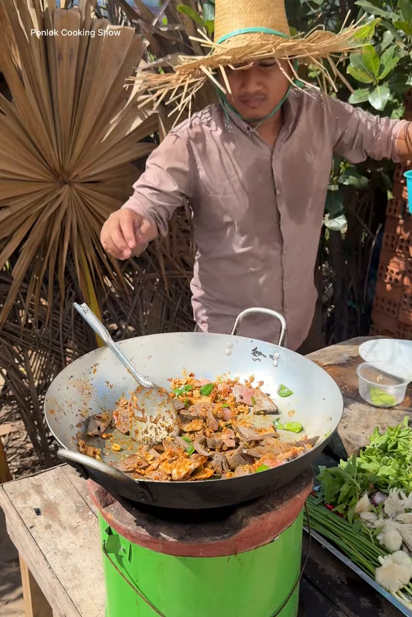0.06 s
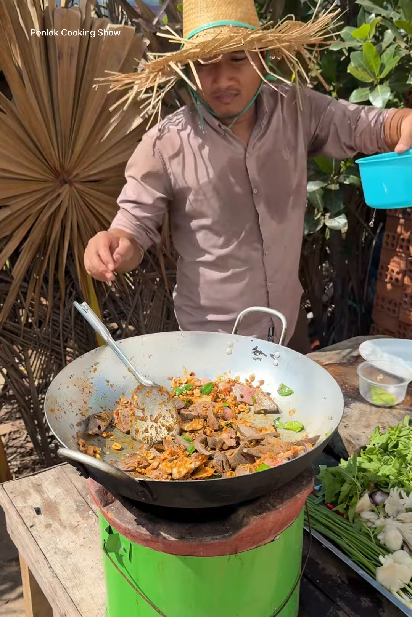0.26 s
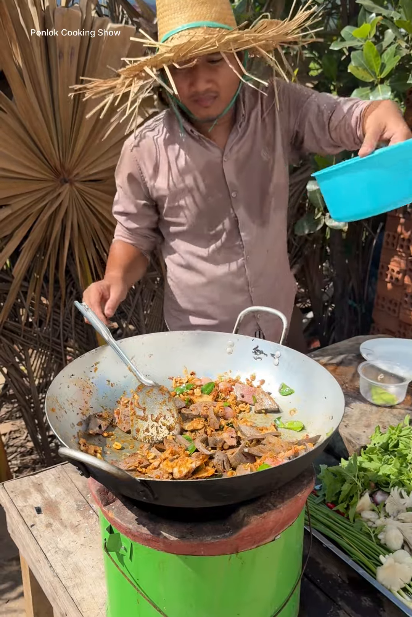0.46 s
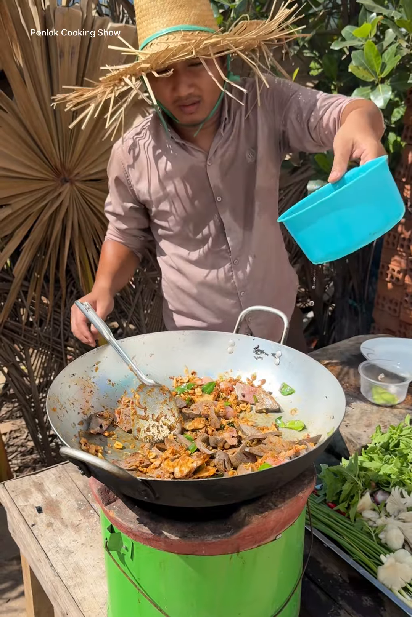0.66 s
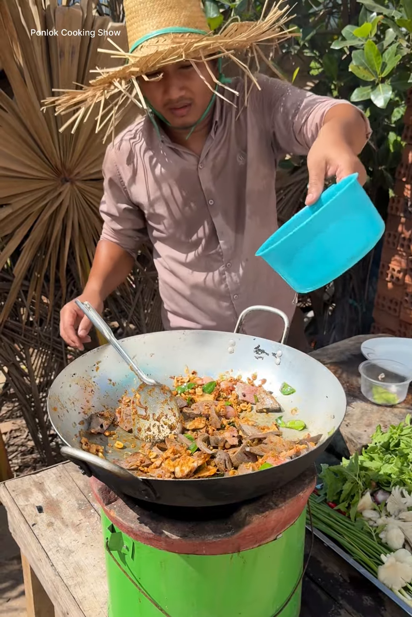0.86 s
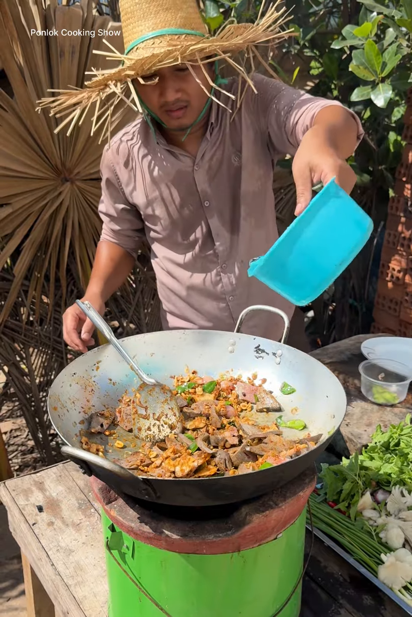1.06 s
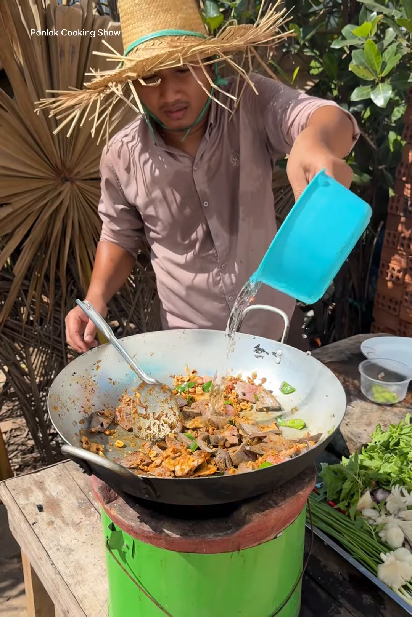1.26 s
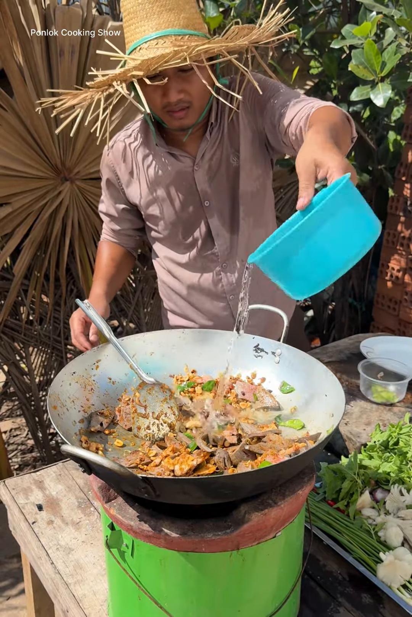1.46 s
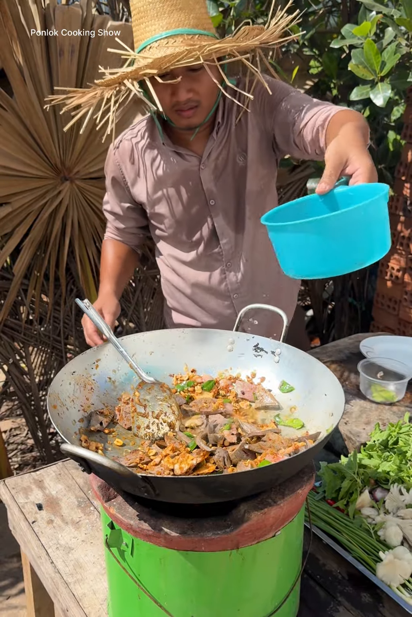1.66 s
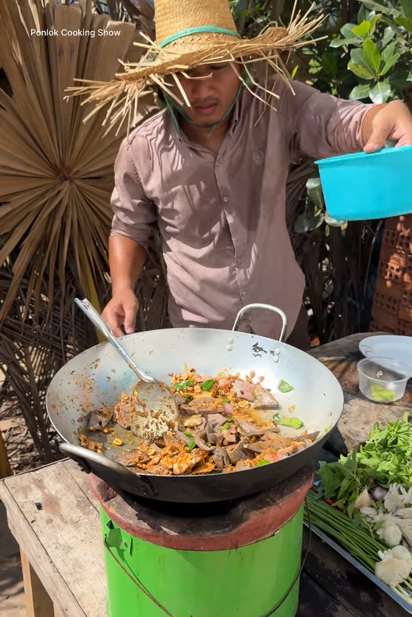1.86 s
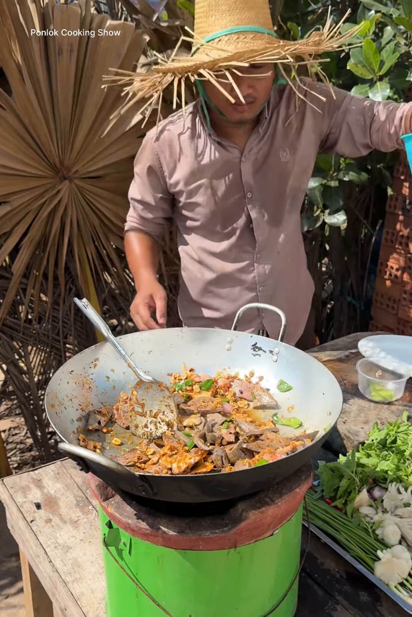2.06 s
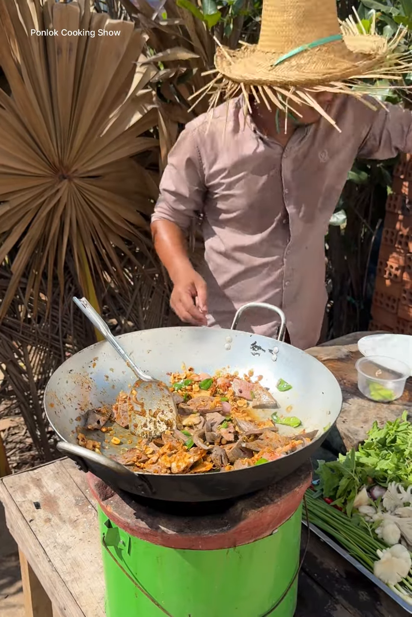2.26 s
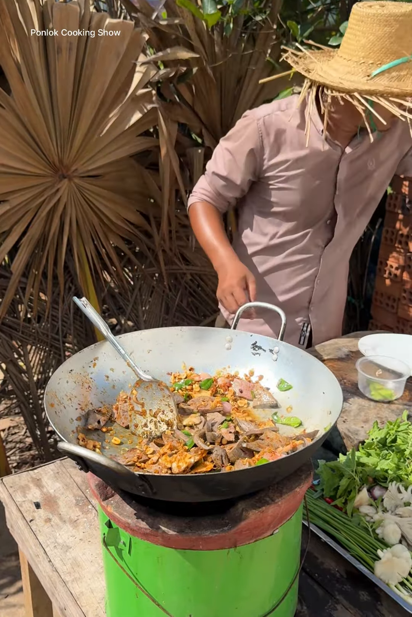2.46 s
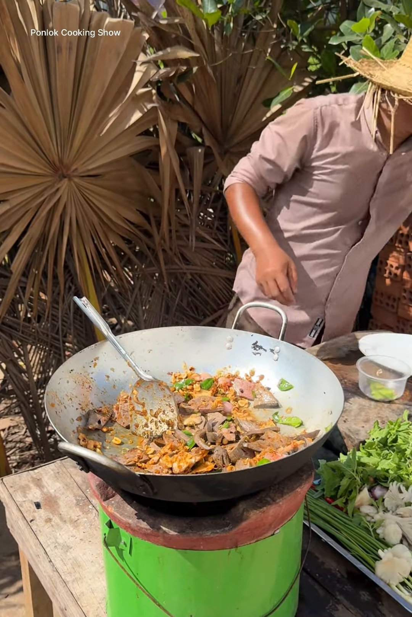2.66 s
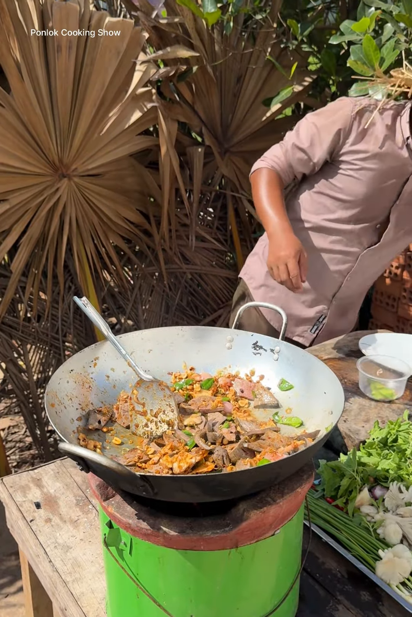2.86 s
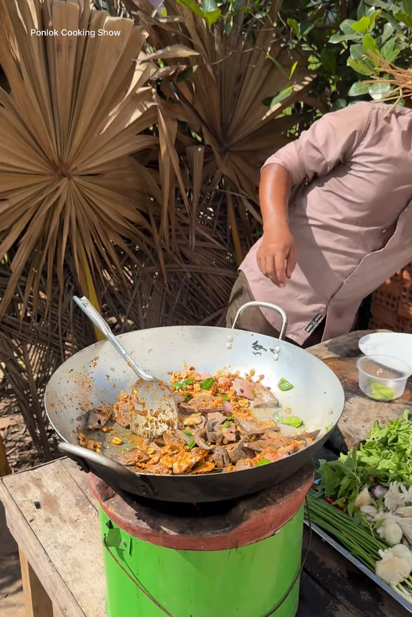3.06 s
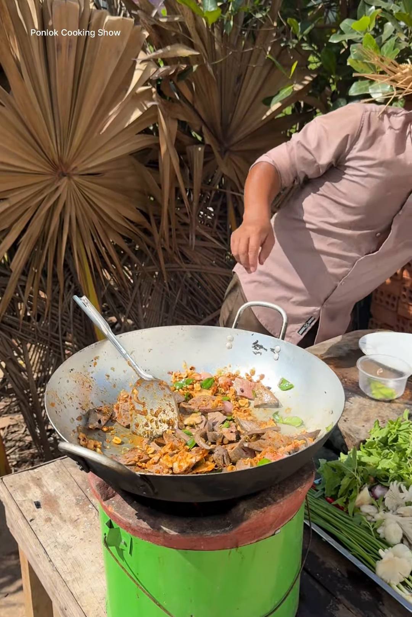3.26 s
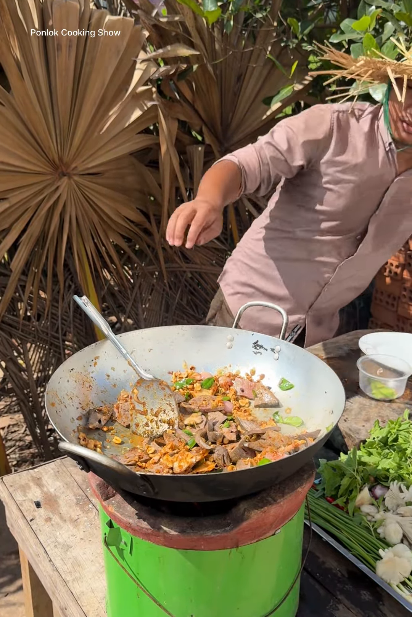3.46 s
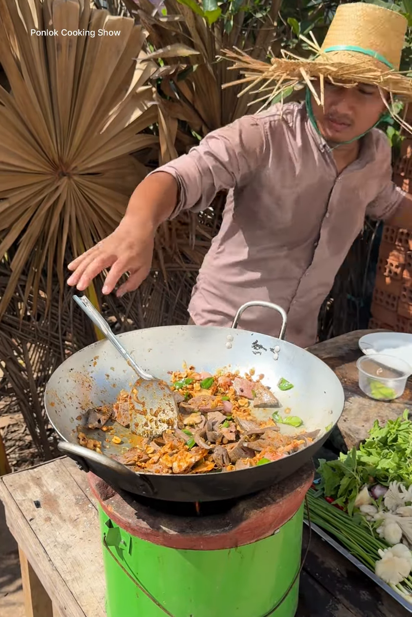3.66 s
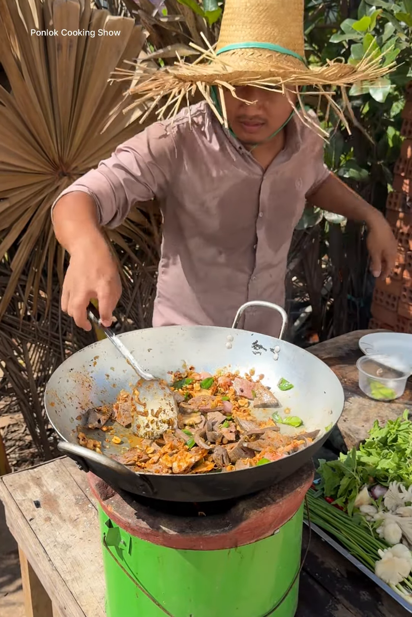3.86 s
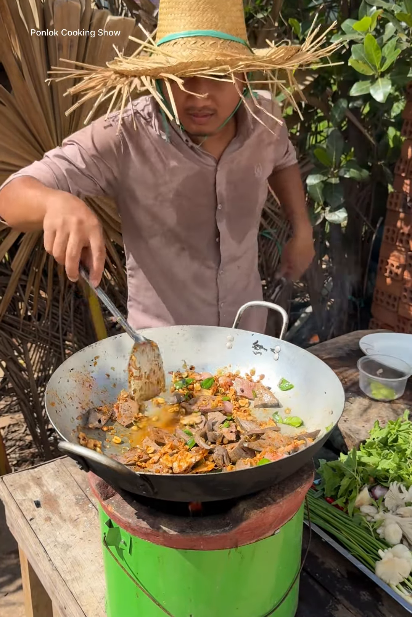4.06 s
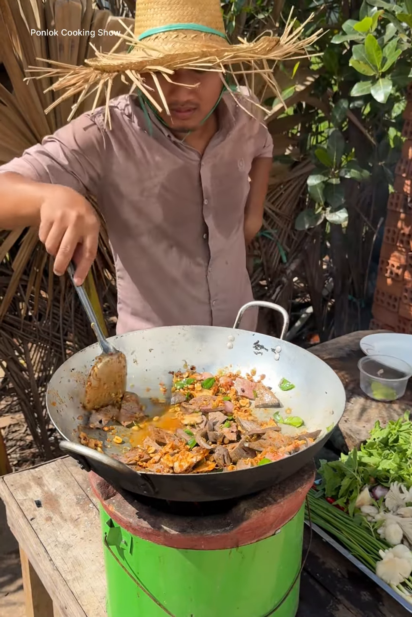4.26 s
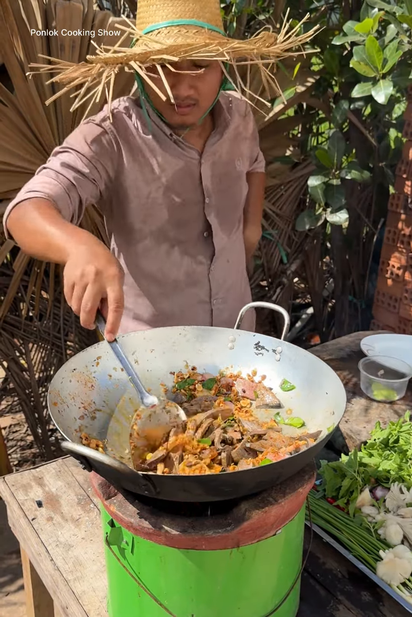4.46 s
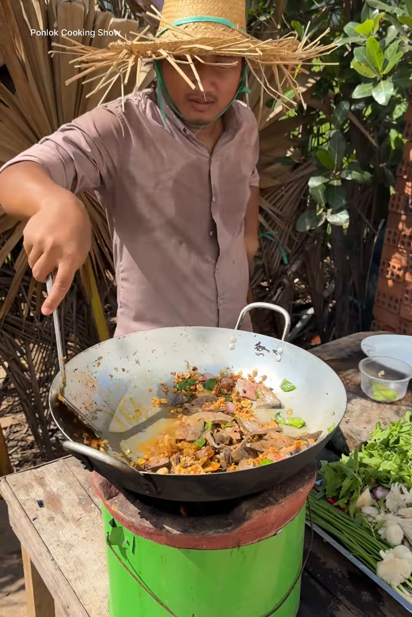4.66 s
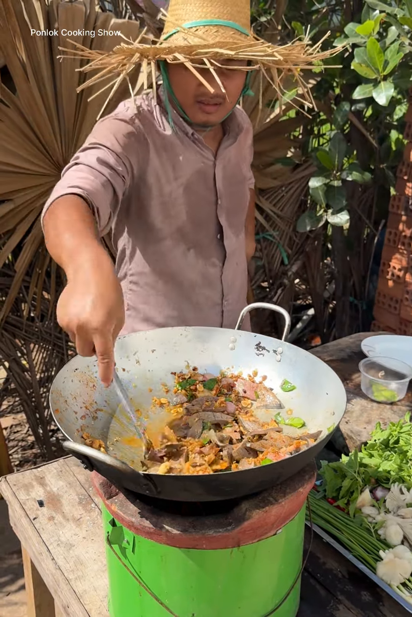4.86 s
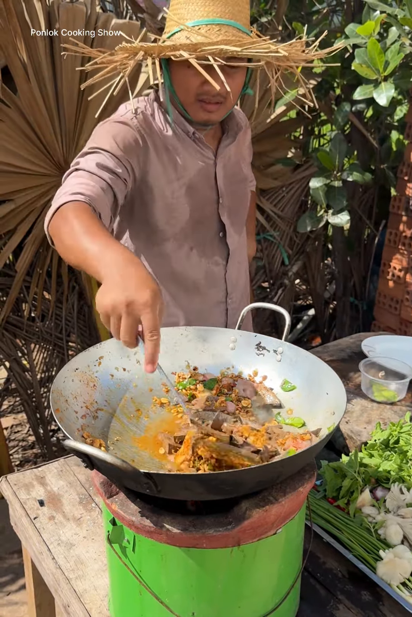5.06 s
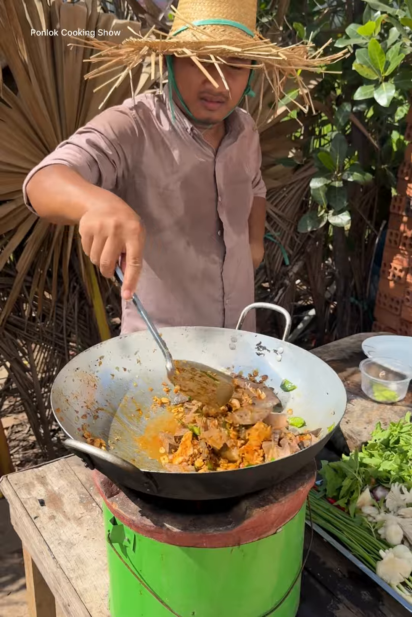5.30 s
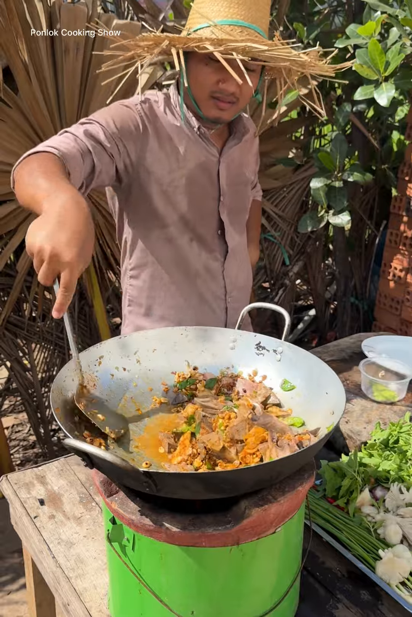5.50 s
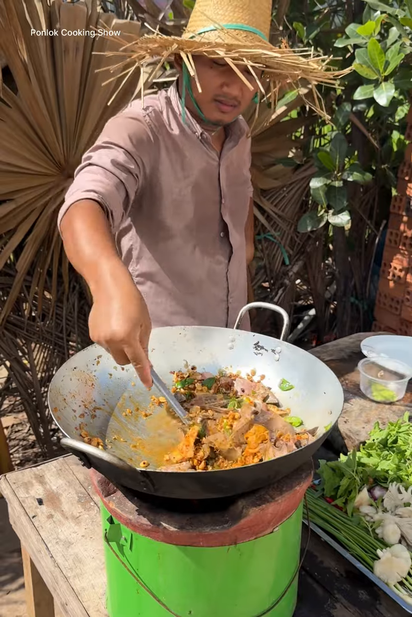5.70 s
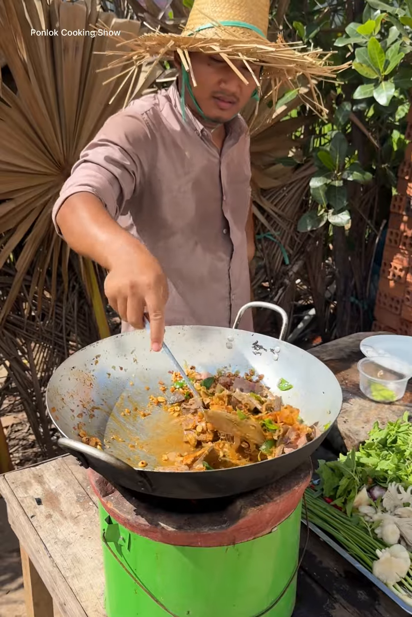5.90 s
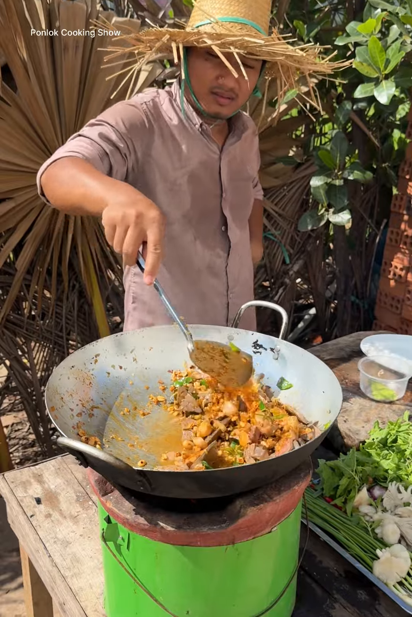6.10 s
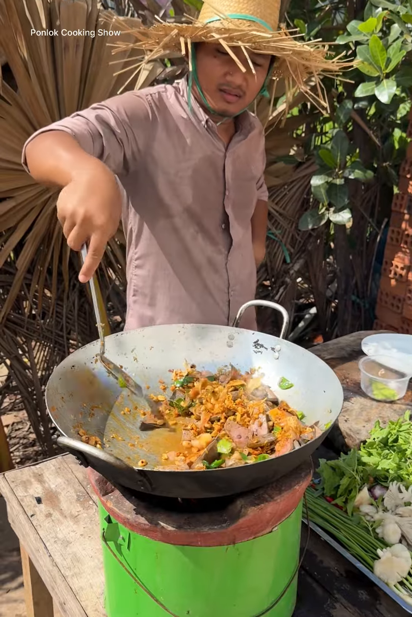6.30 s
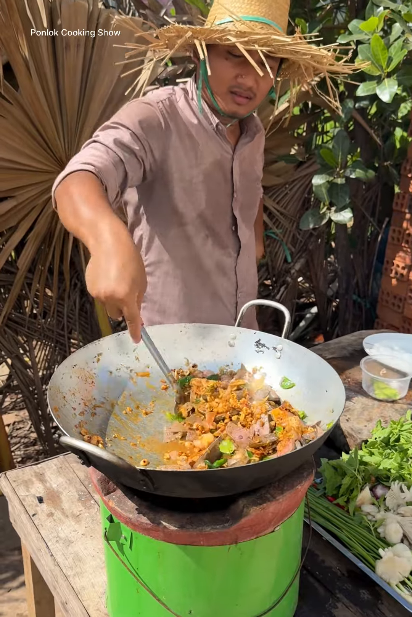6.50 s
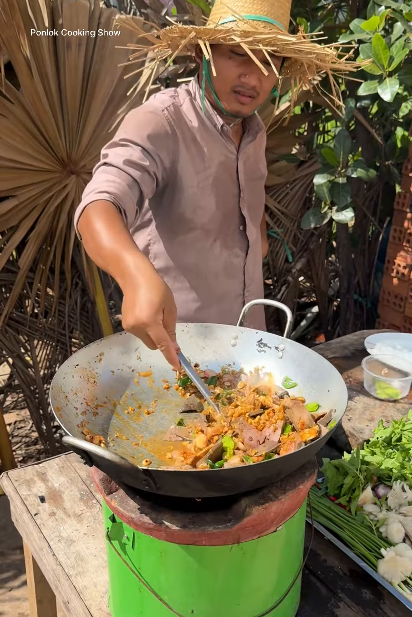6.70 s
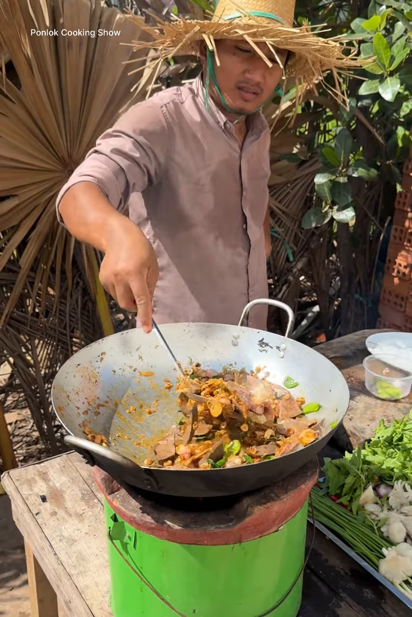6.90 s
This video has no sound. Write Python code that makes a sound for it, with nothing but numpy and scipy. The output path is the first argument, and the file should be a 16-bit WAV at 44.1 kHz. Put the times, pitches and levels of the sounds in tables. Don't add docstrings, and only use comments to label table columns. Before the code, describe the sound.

Close outdoor phone pickup in stereo: fat crackles steadily in a steel wok, then water makes it flare into a loud steamy hiss around one and a half seconds. It subsides with sharp spits. A hollow plastic tub lands and rocks, small birds chirp, then a metal spatula clacks, scrapes and chatters in bursts as the sizzle grows thin. A distant engine hums behind.

```python
import sys
import numpy as np
from scipy import signal
from scipy.fft import rfft, irfft, next_fast_len
from scipy.io import wavfile
from scipy.ndimage import uniform_filter1d

SR = 44100
rng = np.random.default_rng(int(sys.argv[2]) if len(sys.argv) > 2 else 0)


def linear_from_db(decibels):
    return 10 ** (np.asarray(decibels, float) / 20)


def unload_audio(sound):
    columns = np.transpose(np.atleast_2d(sound))
    steps = np.round(np.clip(columns, -1, 1) * 32767)
    wavfile.write(sys.argv[1], SR, steps.astype(np.int16))


N = 306054
TIME = np.arange(N) / SR
SIZE = next_fast_len(N + 8192)
BINS_HZ = np.maximum(np.arange(SIZE // 2 + 1) * SR / SIZE, 1)


def rms_one(x):
    return x / np.sqrt(np.mean(x ** 2) + 1e-20)


def in_time(rows):
    s, level_db = np.transpose(rows)
    return np.interp(TIME, s, level_db)


def at_hz(points, ends=None):
    hz, value = np.transpose(points)
    return np.interp(np.log(BINS_HZ), np.log(hz), value, ends, ends)


def colour(x, spectrum):
    return rms_one(irfft(rfft(x, SIZE) * linear_from_db(at_hz(spectrum, -80)), SIZE)[..., :N])


def drift(rate):
    r = np.exp(-80 * np.pi * rate / SR)
    white = rng.standard_normal(N // 40 + 2002)
    slow = signal.lfilter([1], [1, -2 * r, r * r], white)[2000:]
    return np.interp(np.arange(N) / 40, np.arange(len(slow)), rms_one(slow))


def grains(per_s, spread_db):
    sizes = linear_from_db(spread_db * np.minimum(rng.exponential(1, N), 5)) * rng.choice([-1, 1], N)
    return rms_one(sizes * (rng.random(N) < per_s / SR))


def patchy(x, edges_hz, patch_db, rate):
    out = 0
    for k, pair in enumerate(zip(edges_hz, edges_hz[1:])):
        band = signal.sosfilt(signal.butter(2, pair, "band", fs=SR, output="sos"), x)
        out = out + (-1) ** k * linear_from_db(patch_db * drift(rate)) * band
    return rms_one(out)


def bursts(times, peaks_db, t60s, spectrum):
    envelope = np.zeros(N)
    for s, peak_db, t60 in zip(times, peaks_db, t60s):
        tail = envelope[int(s * SR):int((s + t60) * SR)]
        age = np.arange(len(tail)) / SR
        tail += linear_from_db(peak_db - 60 * age / t60) * (1 - np.exp(-age / 0.00084))
    return envelope * colour(rng.standard_normal(N), spectrum)


def ring(clicks, hz, t60):
    r, w = linear_from_db(-60 / (t60 * SR)), 2 * np.pi * hz / SR
    return signal.lfilter([0, np.sin(w)], [1, -2 * r * np.cos(w), r * r], clicks + 1e-18)


def ping(at, hz, level_db, t60):
    out, age = np.zeros(N), np.arange(int(t60 * SR)) / SR
    tail = out[int(at * SR):int(at * SR) + len(age)]
    tail += (linear_from_db(level_db - 60 * age / t60) * np.sin(2 * np.pi * hz * age))[:len(tail)]
    return out


def strike(modes, times, levels_db, scatter_db=0):
    at, out = (np.asarray(times) * SR).astype(int), 0
    chance = rng.standard_normal((len(at), len(modes)))
    for k, (hz, level_db, t60) in enumerate(modes):
        clicks = np.zeros(N)
        clicks[at] = linear_from_db(levels_db + level_db + scatter_db * chance[:, k]) * (-1) ** k
        out = out + ring(clicks, hz, t60)
    return out


def rub(modes, contact, damping):
    out = 0
    for k, (hz, level_db, t60) in enumerate(modes):
        mode = rms_one(ring(contact, hz, t60 * damping))
        out = out + linear_from_db(level_db + 3.2 * drift(13.5)) * (-1) ** k * mode
    return rms_one(out)


def glides(rows):
    out = np.zeros(N)
    for s, length, start_hz, end_hz, level_db, *arch_hz in rows:
        n, at = int(length * SR), int(s * SR)
        hz = np.linspace(start_hz, end_hz, n) + sum(arch_hz) * np.sin(np.linspace(0, np.pi, n))
        tone = np.sin(2 * np.pi * np.cumsum(hz) / SR)
        out[at:at + n] += linear_from_db(level_db + 5.5) * np.sqrt(np.hanning(n)) * tone
    return out


# peak time in seconds, width in seconds, level in dB.
GUSTS = [(.2, 0.06, -43), (.4, 0.13, -43), (0.758, .04, -44), (1.2, .2, -72), (1.75, 0.082, -63.5),
         (2.3, 0.092, -26), (3.5, 0.21, -64), (4.2, 0.18, -44), (5.4, 0.031, -38), (6.18, .13, -37),
         (6.8, .1, -59)]


def wind():
    level = linear_from_db(-69)
    for s, width, level_db in GUSTS:
        level = level + linear_from_db(level_db) * np.exp(-((TIME - s) / width) ** 2)
    spectrum = [(25, -22), (60, 11), (130, 1), (220, -17), (500, -31), (1200, -38)]
    noise = colour(rng.standard_normal(N) * linear_from_db(5.3 * drift(12)), spectrum)
    return linear_from_db(-13) * level * noise * [[1], [-1]]


# multiple of the engine speed, rms level in dB.
ORDERS_DB = [(2, -57), (3, -59), (4, -65), (5, -52), (6, -54), (7, -62.5), (8, -74.5), (9, -64)]
# time in seconds, level in dB.
ENGINE_FADE = [(0, 2), (3.5, 2.5), (5.2, -4.5), (6.94, -5)]
# frequency in Hz, density in dB per Hz.
RUMBLE = [(12, -47), (20, -65), (43, 4), (91, 1.5), (128, 1.5), (189, -11), (309, -11), (353, -20.5),
          (700, -23.5), (910, -16), (1540, -120)]


def engine():
    speed_hz = 24.45 * (1 + 0.00588 * drift(0.48))
    turn = 2 * np.pi * np.cumsum(speed_hz) / SR
    lines = 0
    for k, level_db in ORDERS_DB:
        line = np.sin(k * turn + rng.uniform(0, 7.85))
        lines = lines + linear_from_db(level_db + 2.0 + 2.8 * drift(2.4)) * line
    rumble = linear_from_db(-46.5 + 1.5 * drift(2.2)) * colour(rng.standard_normal(N), RUMBLE)
    return linear_from_db(in_time(ENGINE_FADE)) * lines + rumble


# start in seconds, length in seconds, start Hz, end Hz, level in dB.
DRONE = [
    (5.2, 1.325, 57.23, 62.9, -51.5),
]


def lorry():
    return glides(DRONE)


# start in seconds, length in seconds, start Hz, end Hz, level in dB, arch in Hz.
BIRDS = [
    (3.445, 0.047, 4350, 4380, -58, 0),
    (3.81, .055, 4120, 3720, -49, 170),
    (3.96, .052, 3950, 3880, -49, 130),
    (4.595, .035, 4250, 4220, -55, 0),
]


def birds():
    return glides(BIRDS)


# time in seconds, level in dB.
TUB_HITS = [
    (3.416, -23.5),
    (3.429, -29),
    (3.44, -30),
    (3.483, -41),
    (3.292, -46),
]
# frequency in Hz, level in dB, decay time t60 in seconds.
TUB = [(214, -13, 0.12), (330, -6, 0.18), (407, -16, 0.093), (470, 6.5, 0.15), (521, -7, 0.13),
       (606, 0, 0.15), (634, 0.5, 0.15), (800, -18, .05), (1028, -4, 0.13), (1400, -8, .05),
       (1620, -3, 0.071), (1850, -22, .04)]


def tub():
    s, level_db = np.transpose(TUB_HITS)
    knock = bursts(s, level_db - 3.0, s * 0 + 0.07, [(300, 7), (1000, 0), (2500, -9), (6000, -19)])
    return strike(TUB, s, level_db - 8.0, scatter_db=2.0) + knock


# time in seconds, level in dB.
VIGOUR = [(0.0, -42), (.82, -41.5), (.89, -38), (1.26, -35.5), (1.46, -32.5), (1.66, -37.5), (2.2, -41),
          (3.05, -45), (4.0, -45.5), (4.95, -49.5), (5.45, -51), (5.7, -48), (6.2, -52), (6.94, -52.5)]
# frequency in Hz, density in dB per Hz.
HUM = [(230, 5), (300, -8.5), (360, 8), (430, 2.5), (600, -4), (900, -9)]
BUBBLING = [(500, -13), (900, -8), (1250, 2.5), (1550, -3), (2200, 2.5), (3200, 1.5), (4500, -5.5),
            (5300, -7), (5800, -15), (7000, -7.5)]
FIZZ = [(3000, -10), (4500, -5.5), (5700, -11.5), (6500, -6.5), (8000, -6.5), (10500, -0.5), (12000, -2),
        (14000, 1.5), (15300, -5.5)]
FULL_BOIL_DB, FIZZ_DB = -34.5, -32
BUBBLING_DB, BUBBLING_FOLLOWS = -35, 0.75
WET_S, WETTING_S, DRY_LOSS_DB = 1.352, 0.089, 6
HUM_DB, HUM_FOLLOWS, HUM_LAG_S = -47, 1.4, .12


def frying():
    swing_db = in_time(VIGOUR) - FULL_BOIL_DB
    dry_share = .5 - .5 * np.tanh((TIME - WET_S) / WETTING_S)
    boil_db = BUBBLING_FOLLOWS * swing_db - DRY_LOSS_DB * dry_share
    hum_db = HUM_DB + HUM_FOLLOWS * np.interp(TIME - HUM_LAG_S, TIME, boil_db)
    hum = colour(rng.standard_normal(N) * linear_from_db(2.4 * drift(17)), HUM)
    bubbling = colour(grains(9000 * linear_from_db(1.5 * drift(25)), spread_db=3.0), BUBBLING)
    bubbling = patchy(bubbling, np.geomspace(400, 7500, num=9), patch_db=0.7, rate=42)
    crackle = grains(9000 * linear_from_db(3.0 * drift(40)), spread_db=3.0)
    fizz = colour(crackle + 0.63 * rng.standard_normal(N), FIZZ)
    return linear_from_db(hum_db) * hum + linear_from_db(BUBBLING_DB + boil_db) * bubbling + linear_from_db(FIZZ_DB + swing_db) * fizz


# time in seconds, peak in dB.
SPITS = [(0.3371, -34), (0.7203, -19), (1.863, -15), (2.0153, -16), (2.184, -17), (2.3456, -21),
         (2.394, -20), (2.7137, -30), (3.057, -29), (3.1941, -31), (3.239, -22), (3.3538, -37),
         (3.5443, -30), (3.8636, -36), (3.927, -38), (4.0304, -39)]


def spits():
    s, peak_db = np.transpose(SPITS)
    return bursts(s, peak_db - 12.5, s * 0 + 0.033, FIZZ)


# time in seconds, crack peak in dB, thud in dB, clank frequency in Hz, clank in dB.
CLACKS = [(3.238, -25, -55, 2180, -48), (4.1713, -4.5, -25.5, 1293, -18.5), (4.1865, -13, -40, 2220, -30.5),
          (4.2108, -5.5, -43, 2440, -28), (4.3076, -20, -48, 1860, -34.5), (4.406, -28, -31, 2210, -41),
          (4.44, -44, -57, 1740, -36), (4.6604, -15.5, -29.5, 1770, -28.5), (4.6923, -39, -28, 1840, -38),
          (4.776, -20.5, -44, 1870, -56), (4.7967, -22, -31, 1890, -43), (4.85, -20, -35, 2140, -46),
          (5.5142, -3.5, -33, 1780, -25), (5.5296, -40, -45, 1890, -32), (5.602, -23, -44, 2080, -48),
          (6.33, -28, -40, 1940, -39.5), (6.351, -4, -23, 2250, -27), (6.3644, -26, -14, 1620, -28),
          (6.3745, -20, -21, 2185, -28), (6.393, -7, -31, 1716, -24), (6.5199, -40, -36.5, 1214, -24),
          (6.5718, -43, -49, 1290, -39), (6.5985, -34.5, -36, 1290, -36), (6.9059, -32, -50, 2140, -40.5)]
# frequency in Hz, level in dB, decay time t60 in seconds.
PAN_LOW = [(218, -23, 0.17), (236.5, -5, 0.092), (289, -4.5, 0.04), (338, -7.5, 0.26), (363.8, -2.5, 0.21),
           (418, -4, 0.032), (479, -2.5, 0.074), (638, -7, 0.035)]
PAN_MID = [(955, -3.5, 0.063), (1290, -4.5, 0.1), (1640, -4, 0.12), (1890, -8.5, 0.077), (2083, 2.5, 0.03),
           (2360, -3, 0.12), (2600, -3, 0.11), (2860, -9, 0.027), (3380, -8.5, 0.14)]
PAN_HIGH = [(4014, 11, 0.028), (3990, -0.5, 0.084), (4530, 9, .05), (4870, -8.5, 0.078), (5335, -25, 0.051),
            (5270, 8, 0.05), (6390, -6, 0.23), (7450, -29, .05), (9050, 1, 0.11), (7940, -1, 0.055),
            (10800, -7, 0.035)]
# time in seconds, frequency in Hz, level in dB, decay time t60 in seconds.
RINGS = [(4.173, 2514, -20, 0.05), (4.173, 4400, -30, 0.055), (4.173, 886, -21.5, 0.015),
         (4.212, 4150, -25.5, 0.062), (4.173, 543, -40, 0.11), (4.213, 250, -31, 0.14),
         (4.661, 248, -28, 0.13), (6.353, 495, -25.5, 0.075), (4.406, 358, -24.5, 0.17),
         (4.443, 357, -29, 0.14), (5.632, 406, -37, 0.13), (5.668, 394, -38, 0.12), (4.798, 358, -30, 0.25),
         (5.516, 328, -24.5, 0.095), (5.5165, 1800, -17, 0.065), (5.517, 2040, -22, .05),
         (5.526, 1930, -23, .07), (5.516, 3400, -27, .04), (5.516, 4500, -28, .05), (5.529, 420, -30, .05),
         (5.516, 2750, -26, .06), (5.515, 2140, -30, .1), (5.515, 2360, -26.5, 0.063),
         (5.515, 3620, -33, 0.07), (5.515, 673, -29.5, 0.085), (6.352, 960, -39, 0.092),
         (6.352, 2250, -10, .014), (6.366, 2126, -25, 0.072), (6.386, 300, -17, .06),
         (6.52, 2000, -27, .03), (6.573, 520, -30, .04), (6.497, 330, -30, .1), (4.227, 260, -26, .06),
         (4.803, 340, -30, .2), (6.352, 5335, -28, 0.1), (6.352, 3300, -27, .04), (4.663, 1300, -31, .08),
         (4.665, 2500, -33, .07), (4.174, 620, -24, .03), (6.352, 6060, -24, 0.049),
         (6.365, 155.6, -24, 0.14), (6.375, 4100, -30, 0.099)]
# frequency in Hz, level in dB, decay time t60 in seconds.
GONG = [(281, -1.5, 0.97), (516, -11, 0.53)]
# time in seconds, level in dB.
GONG_HIT = [
    (6.372, -27),
]
# frequency in Hz, density in dB per Hz.
SCRATCH = [(3000, -1), (4500, -6.5), (5500, -10.5), (6200, 1.5), (8000, -2), (11000, 2.5), (14000, 1.5),
           (15700, -8), (16800, -24)]
RATTLE = [(1500, -7), (3000, -2), (4500, -1.5), (6000, -4.5), (8500, -3), (11000, -1), (14000, -2),
          (16500, -42)]
KNOCK = [(200, -12), (500, -2), (1000, 4.5), (2000, -5.5), (3500, -9), (5000, -14)]


def clacks():
    s, peak_db, thud_db, clank_hz, clank_db = np.transpose(CLACKS)
    thud_hz = 308.3 * np.exp(0.136 * rng.standard_normal(len(s)))
    s = s + 0.000834
    out = bursts(s, peak_db + 2.5, s * 0 + 0.008, SCRATCH)
    out += bursts(s, peak_db - 15, s * 0 + 0.045, RATTLE)
    out += bursts(s, clank_db + 3.5, s * 0 + 0.025, KNOCK)
    out += strike(PAN_LOW, s + 0.003, thud_db - 11.5, scatter_db=8.0)
    out += strike(PAN_MID, s, clank_db - 14.0, scatter_db=-0.5)
    out += strike(PAN_HIGH, s, peak_db - 43, scatter_db=3.5)
    clank_t60 = np.clip(0.045 + 0.0011 * (clank_db + 22), .015, .2)
    for k in range(len(s)):
        out += ping(s[k], clank_hz[k], clank_db[k] - 2.0, clank_t60[k])
        out += ping(s[k] + .003, thud_hz[k], thud_db[k] - 0.5, .11)
    for at, hz, level_db, t60 in RINGS:
        out += ping(at, hz, level_db, t60)
    return out + strike(GONG, *np.transpose(GONG_HIT))


# time in seconds, peak in dB.
TICKS = [(5.5132, -22), (5.5203, -10), (5.5222, -14), (5.5283, -11), (6.364, -12), (6.3742, -14),
         (6.389, -21), (4.2762, -26), (4.3431, -24), (4.8028, -24), (4.847, -17), (4.8525, -15),
         (3.2515, -22), (6.906, -26), (4.886, -22), (4.959, -27), (4.531, -30), (4.676, -24), (5.6415, -28),
         (6.476, -31), (6.495, -30), (6.574, -30)]


def skips():
    s, peak_db = np.transpose(TICKS)
    return bursts(s, peak_db - 3.0, s * 0 + .012, SCRATCH)


# start in seconds, length in seconds, start Hz, end Hz, level in dB.
WHINES = [(4.27, .04, 2200, 2100, -47), (4.3, .07, 1300, 1220, -45), (4.29, .07, 1850, 1800, -46),
          (4.33, .08, 2400, 3100, -47), (4.355, .06, 4950, 4950, -47), (4.4, .04, 2250, 2100, -44),
          (4.535, .04, 2300, 2100, -49), (4.8, .04, 2000, 2300, -48), (4.84, .07, 2150, 1850, -44),
          (4.92, .05, 1900, 1950, -46), (4.8, .1, 5400, 5550, -46), (4.89, .08, 5300, 5000, -48),
          (4.8, .09, 3900, 4200, -46), (5.63, .04, 2050, 2150, -48), (5.65, .07, 1900, 1400, -54),
          (5.715, .13, 1300, 1250, -51), (6.575, .045, 1300, 1300, -43), (6.58, .04, 1950, 1700, -44)]


def whines():
    low_pass = signal.butter(2, 130, fs=SR)
    flutter = rms_one(signal.lfilter(*low_pass, rng.standard_normal(N)))
    return glides(WHINES) * (.3 + flutter)


# start in seconds, length in seconds, start Hz, end Hz, level in dB, arch in Hz.
SQUEAKS = [
    (6.012, .045, 890, 960, -48, 45),
    (6.048, .032, 970, 780, -52, 0),
]


def squeaks():
    return glides(SQUEAKS)


# time of most force in seconds, half length in seconds, force in dB,
# hiss over grind in dB, rumble over grind in dB.
STROKES = [(3.247, .024, -52, 11, -8), (4.197, .022, -41, 6, -8), (4.229, 0.028, -34.5, -4, -4.5),
           (4.289, 0.086, -40.5, 1, 0), (4.367, 0.075, -38, 3.5, -2), (4.421, 0.073, -35.5, -11, -9),
           (4.675, .022, -42, 0, -6), (4.55, .04, -48, -8, -10), (4.715, 0.034, -44, -11, 2),
           (4.758, 0.028, -45.5, -4, 2), (4.82, 0.036, -41, 6, -6), (4.876, 0.055, -38, 8, -4),
           (4.94, .07, -44, 6, -8), (5.548, 0.029, -40, -7.5, -14), (5.589, .05, -49.5, 8, -1),
           (5.65, 0.072, -43, -10.5, -1), (5.75, .13, -46, -7.5, -7.5), (6.036, .03, -49.5, -2, -1.5),
           (6.147, .05, -51.5, -7.5, -0.5), (6.425, .04, -48.5, -1, 7), (6.446, 0.02, -49.5, 6, -4),
           (6.504, 0.052, -44.5, -4, 6), (6.588, 0.059, -36.5, -14, -4)]
EDGE_HZ, EDGE_SAG_HZ_PER_S, EDGE_WANDER_HZ = 1950, 1600, 90
OVERTONE_HZ, OVERTONE_RISE_HZ, FAST_DB = 4190, 897, -30


def strokes():
    grit = grains(1000 * linear_from_db(3.9 * drift(40)), spread_db=3.0)
    contact = rms_one(0.55 * grit + grains(8000 * linear_from_db(1.6 * drift(60)), spread_db=3.0))
    rumble = rub(PAN_LOW, contact, damping=1.0)
    grind = rub(PAN_MID, contact, damping=0.24)
    hiss = rms_one(colour(contact, SCRATCH) + 0.4 * rub(PAN_HIGH, contact, damping=.22))
    narrow = rms_one(signal.lfilter(*signal.butter(2, 180, fs=SR), contact))
    wide = rms_one(signal.lfilter(*signal.butter(2, 600, fs=SR), contact))
    s, half, force_db, speed_db, weight_db = np.transpose(STROKES)[:, :, None]
    age = TIME - s
    force = linear_from_db(force_db) * np.maximum(1 - (age / (1.1 * half)) ** 2, 0) ** 2
    total = force.sum(axis=0)
    friction = np.sum(force * linear_from_db(speed_db), axis=0)
    shake = np.sum(force * linear_from_db(weight_db), axis=0)
    late = np.sum(force * np.clip(age, 0, .3), axis=0) / (total + 1e-9)
    edge_hz = EDGE_HZ - EDGE_SAG_HZ_PER_S * late + EDGE_WANDER_HZ * drift(9.7)
    over_hz = OVERTONE_HZ + OVERTONE_RISE_HZ * friction / linear_from_db(FAST_DB)
    edge = narrow * np.sin(2 * np.pi * np.cumsum(edge_hz) / SR)
    over = wide * np.sin(2 * np.pi * np.cumsum(over_hz) / SR)
    return shake * rumble + linear_from_db(-3.0) * total * (grind + 0.7 * edge) + friction * (hiss + 0.3 * over)


# frequency in Hz, lead of the left in radians.
LEAD = [(0, 0.44), (180, .45), (300, .3), (470, 0.92), (620, 0.1), (780, -1.5), (1200, 0), (1500, -.4),
        (2000, 0.2), (2900, 0.95), (3500, 1), (3800, -.1), (5700, 0.6), (7100, -2.4), (7600, 0),
        (8000, 0.12)]
# frequency in Hz, left minus right in dB.
TILT = [(300, -0.5), (560, 1.5), (700, 6.5), (880, -4.5), (1300, -2), (2200, -4.5), (3500, 3), (5000, 4.5),
        (5900, -2), (7200, 5), (7700, -1), (16000, 0.5)]
# frequency in Hz, likeness from 0 to 1.
LIKENESS = [(100, .985), (280, .985), (500, .93), (700, .55), (1000, .82), (2100, .97), (3200, .55),
            (4200, .86), (5000, .88), (5900, .93), (7200, .4), (7600, .95), (8300, .98), (9000, .95),
            (16000, .97)]
PORT_LAG_S = 1 / 3070


def ports(x):
    echo = rng.standard_normal(6000) * linear_from_db(-60 * np.arange(6000) / (.13 * SR))
    scatter = rfft(echo / np.sqrt(np.sum(echo ** 2)), SIZE)
    alike = np.clip(at_hz(LIKENESS), 0, 1)
    hz, lead = np.transpose(LEAD)
    lead = np.interp(BINS_HZ, hz, lead) - 2 * np.pi * PORT_LAG_S * np.maximum(BINS_HZ - hz[-1], 0)
    side = np.array([[1], [-1]])
    mix = np.sqrt((1 + alike) / 2) + side * np.sqrt((1 - alike) / 2) * scatter
    gain = linear_from_db(side * at_hz(TILT) / 2) * np.exp(.5j * side * lead)
    return irfft(rfft(x, SIZE) * mix * gain, SIZE)[:, :N]


def scene():
    background = engine() + lorry() + birds() + tub()
    spatula = clacks() + skips() + whines() + squeaks() + strokes()
    return ports(background + frying() + spits() + spatula) + wind()


def thin(x, under_db, top_hz, top_db, spare):
    band_bins, frame, grid = 16, 2048, 854
    hop, n = frame // 2, np.arange(frame) + .5
    window = np.sin(np.pi * n / frame)[:, None]
    basis = window * np.cos(np.pi / hop * np.outer(n + hop / 2, n[:hop]))
    lead, frames = frame - grid, N // hop + 3
    padding = ((0, 0), (lead, (frames + 1) * hop - N - lead))
    hops = np.pad([x[0] + x[1], x[0] - x[1]], padding).reshape(2, -1, hop)
    lines = np.concatenate([hops[:, :-1], hops[:, 1:]], axis=2) @ basis
    bands = lines.reshape(2, frames, -1, band_bins)
    band_power = np.mean(bands ** 2, axis=3)
    power = uniform_filter1d(band_power, size=2, axis=1)
    centre = (np.arange(power.shape[2]) + .5) * band_bins * SR / frame
    mood = rng.standard_normal((2, *power.shape))
    weak = (power < power[::-1] * linear_from_db(2 * (under_db + 2.5 * mood[0]))) & (centre > 2500)
    top = np.sum(band_power * (centre > top_hz / 2), axis=(0, 2))
    before = np.minimum(np.roll(top, shift=2), np.roll(top, shift=3))
    sudden = top > linear_from_db(2 * top_db) * before
    weak = (weak | (centre > top_hz)) & ~sudden[:, None] | (centre > 1.075 * top_hz)
    step = spare * np.clip(centre / 6000, .1, 1) ** .5 * linear_from_db(3.0 * mood[1]) * np.sqrt(power)
    step = step * ~sudden[:, None]
    bands = bands * (np.abs(bands) > step[..., None])
    back = (bands * ~weak[..., None]).reshape(2, frames, hop) @ basis.T * 2 / hop
    joined = (back[:, 1:, :hop] + back[:, :-1, hop:]).reshape(2, -1)
    mid, side = joined[:, lead - hop:lead - hop + N]
    return np.array([mid + side, mid - side]) / 2


def top_cut(x):
    return signal.sosfilt(signal.butter(12, 16500, fs=SR, output="sos"), x)


def record(dry):
    mix = thin(dry, under_db=-8.0, top_hz=15300, top_db=6.0, spare=.3)
    return top_cut(mix)


dry = scene()
out = record(dry)
unload_audio(out)
```